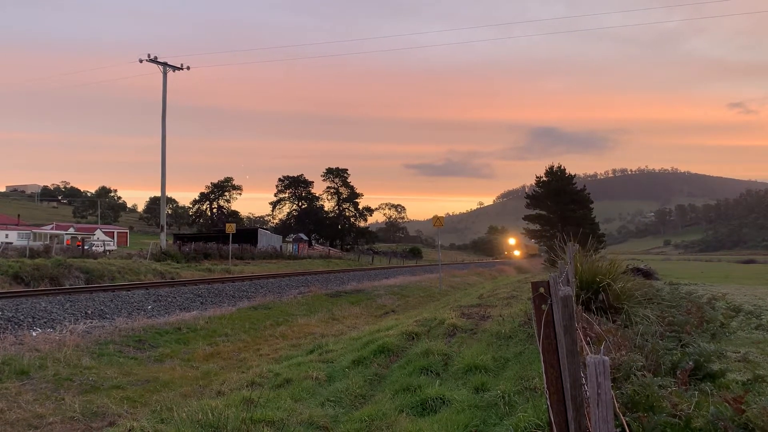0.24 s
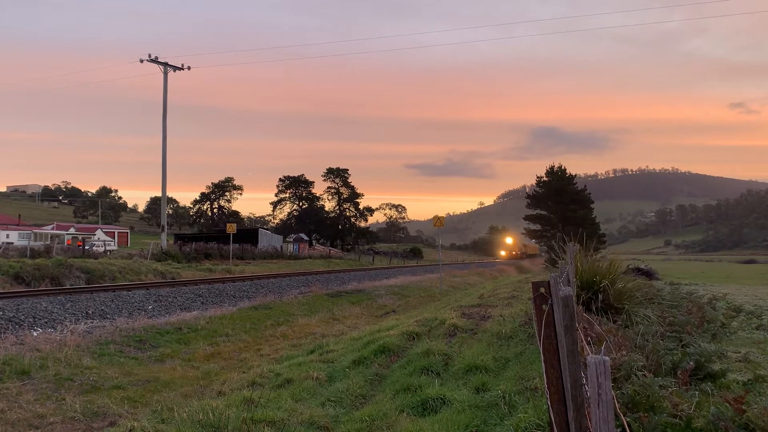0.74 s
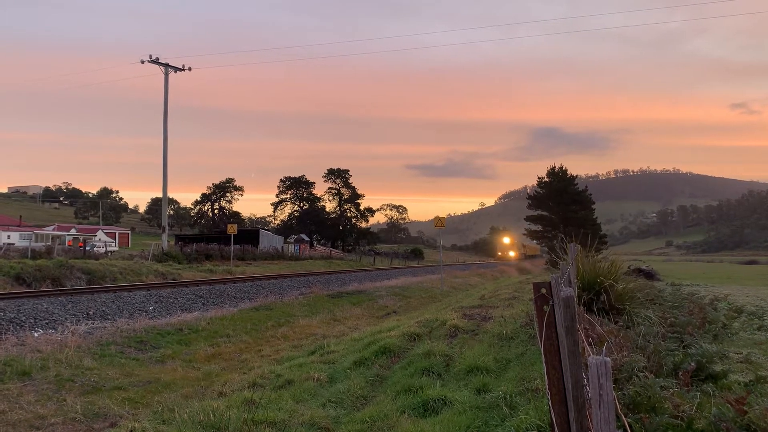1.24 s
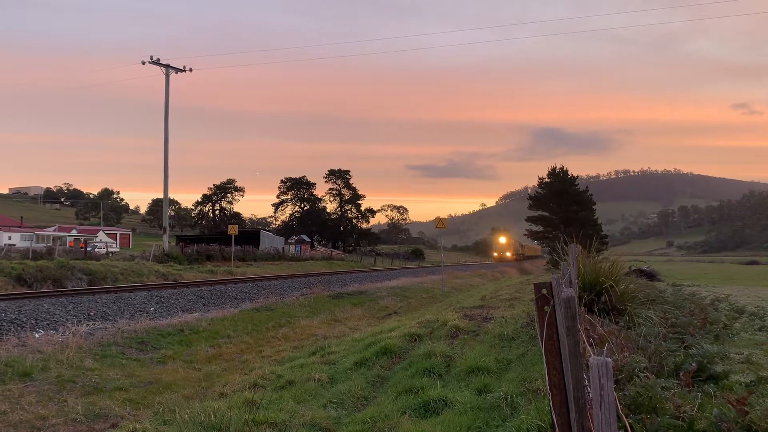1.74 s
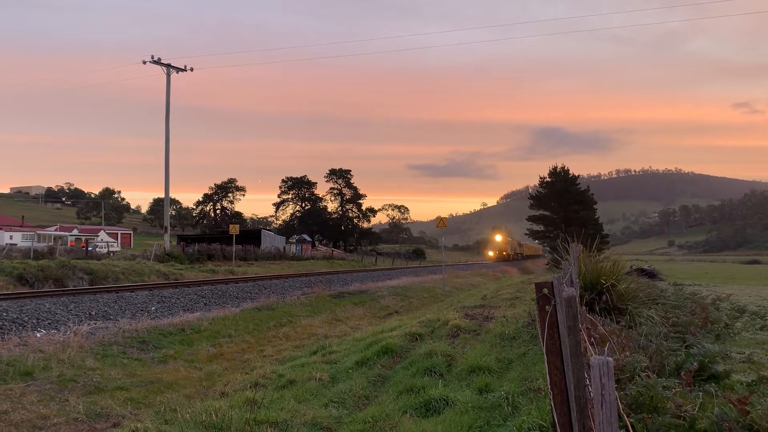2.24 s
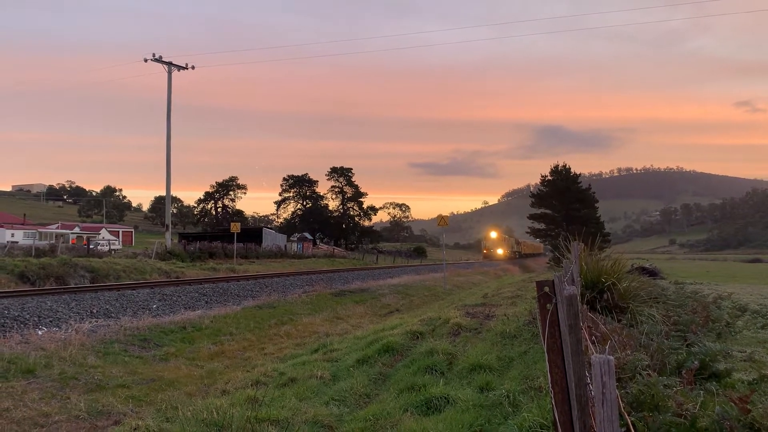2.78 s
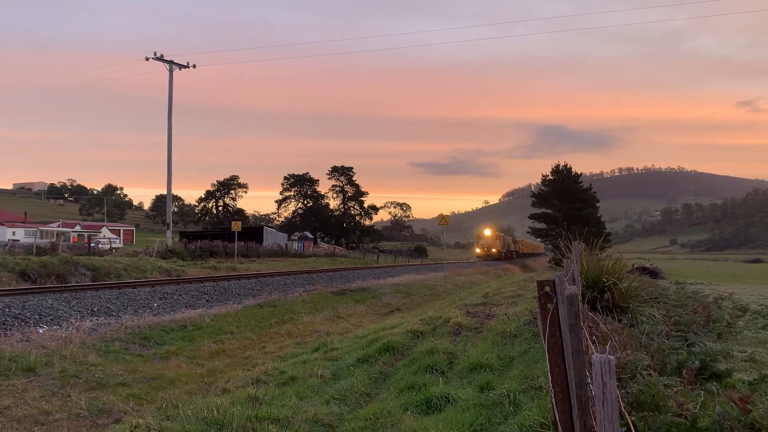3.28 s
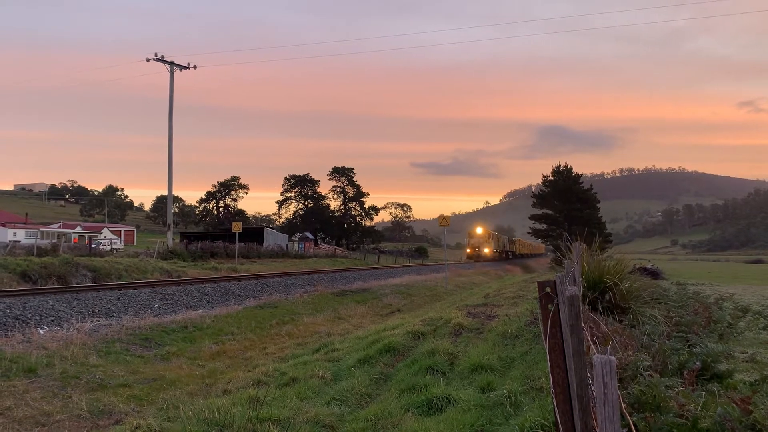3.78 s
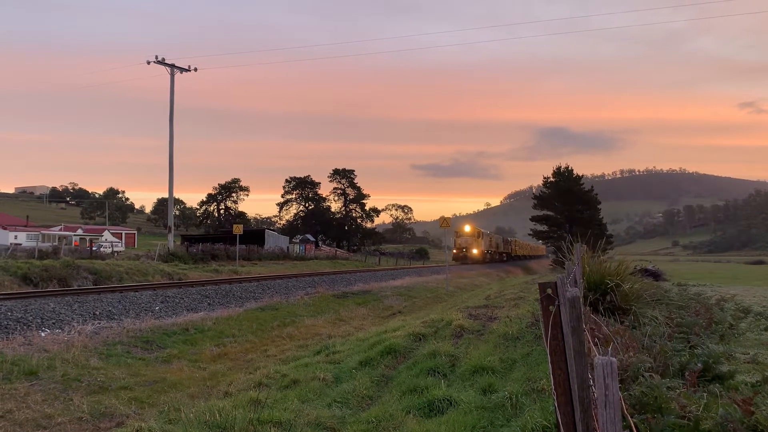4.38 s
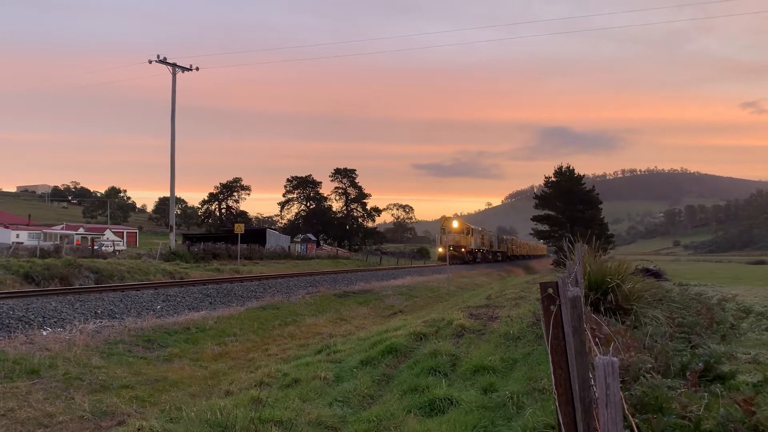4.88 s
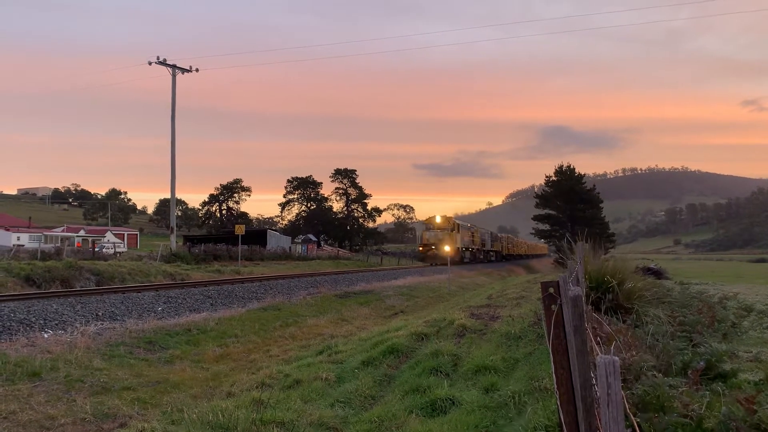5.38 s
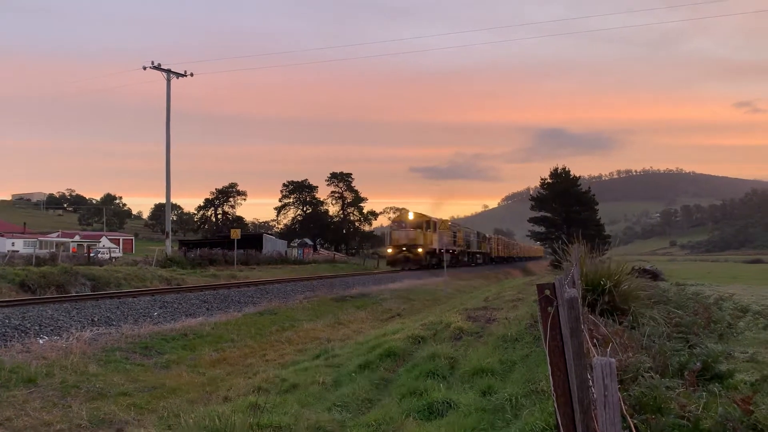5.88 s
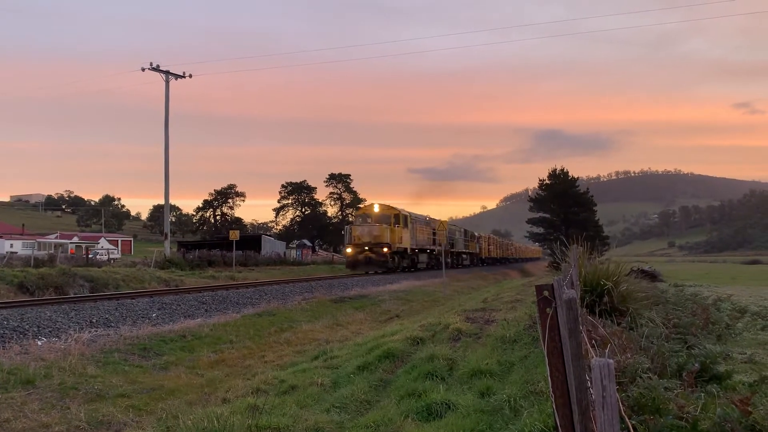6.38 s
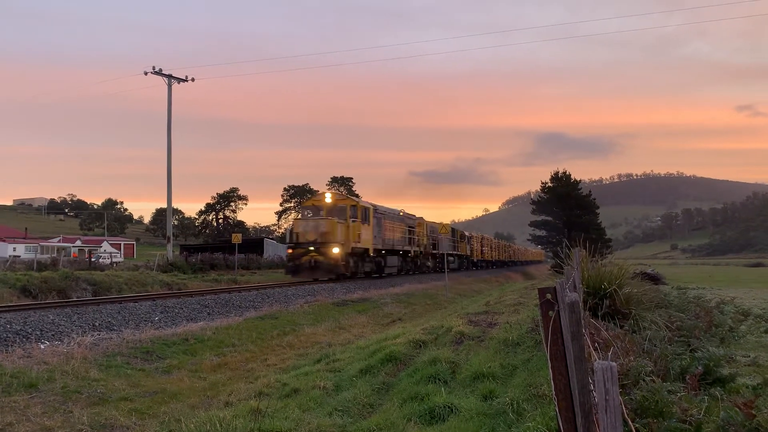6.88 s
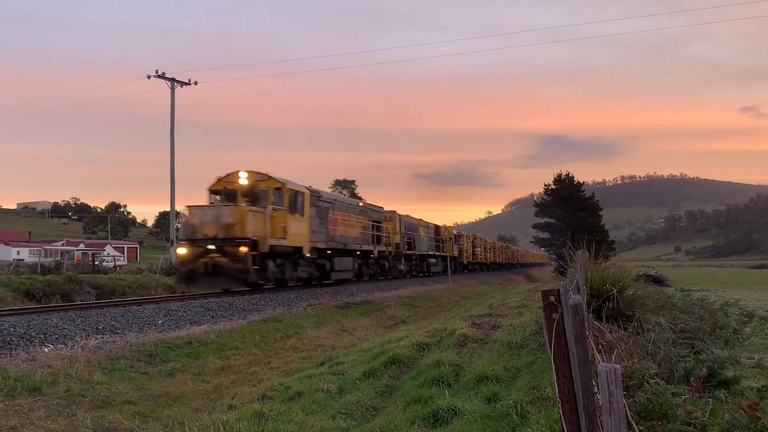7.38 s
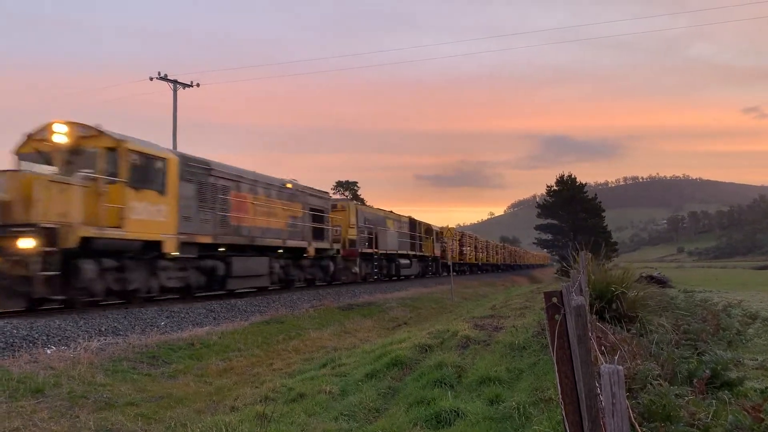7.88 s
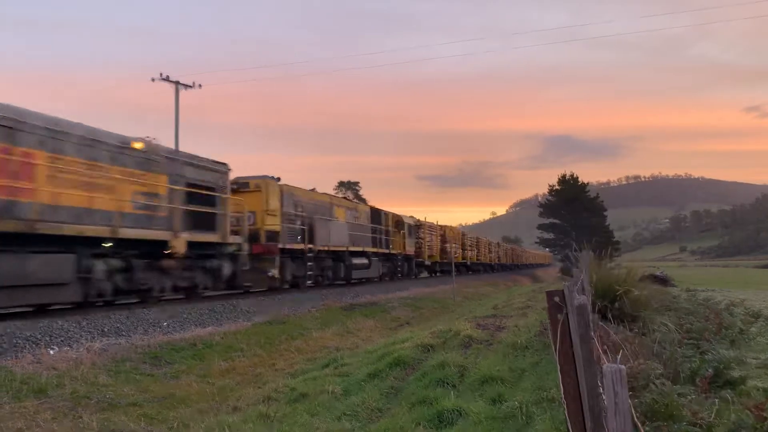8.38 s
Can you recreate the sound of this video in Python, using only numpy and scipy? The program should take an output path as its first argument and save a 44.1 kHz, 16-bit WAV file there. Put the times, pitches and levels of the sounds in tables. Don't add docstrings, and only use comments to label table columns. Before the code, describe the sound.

Open rural trackside, stereo phone microphone. From 0 s soft low wind buffeting covers a distant, muffled diesel drone: an uneven, fast exhaust throb around 95 Hz with faint blower whines near 1.1 kHz. Gusts thump at about 1.8, 2.2 and strongest at 3.2 s, with small wind slaps around 2.8 s. The engines gradually grow and brighten. At 4.6 s a loud, brassy two-note air horn, a major third apart with its low note near 360 Hz, starts breathily, beats slightly and stops at about 5.9 s with a short echo; automatic gain ducks everything beneath it. Background level then slowly recovers. From 6.4 s engine roar, clatter and hiss climb fast, with steel rattles at 6.5 and 7.5 s and short wheel scrapes from 7.7 s. The leading locomotive passes close from about 7.8 s, rails droning, sharp rattles clustering at 8.1-8.4 s, whine rising, still roaring at the 8.6 s end.

```python
import sys
import numpy as np
from scipy import signal
from scipy.fft import rfft, irfft, next_fast_len
from scipy.io import wavfile
from scipy.ndimage import uniform_filter1d, map_coordinates

SR = 44100
rng = np.random.default_rng(int(sys.argv[2]) if len(sys.argv) > 2 else 0)


def transcribe(signal):
    frames = np.atleast_2d(signal).T
    limited = np.clip(frames, -1, 1)
    pcm = np.round(limited * 32767).astype(np.int16)
    wavfile.write(sys.argv[1], SR, pcm)


def boost_factor(decibels):
    exponent = np.asarray(decibels, float) / 20
    return 10 ** exponent


N = 381024


def unit(x):
    return x / np.sqrt(np.mean(x ** 2) + 1e-20)


def along(points, hz):
    f, v = np.transpose(points)
    return np.interp(np.log(hz + 1), np.log(f + 1), v)


def curves(rows):
    s, *cols = np.transpose(rows)
    return [np.interp(np.arange(N) / SR, s, c) for c in cols]


def wobble(rate):
    knots = rng.standard_normal(int(N * rate / SR) + 4)
    return map_coordinates(knots, [np.arange(N) * rate / SR])


def filtered(x, response):
    m = next_fast_len(N + 8192)
    return irfft(rfft(x, m) * response(np.fft.rfftfreq(m, 1 / SR)), m)[..., :N]


def resonance(hz, centre_hz, width_hz):
    return 1j * hz * width_hz / (centre_hz ** 2 - hz ** 2 + 1j * hz * width_hz)


def ports(x, turn, pan):
    def half(hz):
        return boost_factor(along(pan, hz) / 2) * np.exp(.5j * along(turn, hz))
    return filtered(x, lambda hz: np.array([half(hz), 1 / half(hz)]))


# frequency_hz, share common to both ports
ALIKE = [(200, .93), (600, .8), (1500, .8), (2600, .55), (4000, .75), (6200, .7), (13000, .8)]
# frequency_hz, left_lead_rad
FAR_TURN = [(0, 0), (780, 0.2), (1720, 3.8), (2760, 6.7), (4740, 5.9), (6120, 6.3), (6890, 5.4),
            (7750, 3.5), (9470, 2.8), (9820, 1.0), (10400, -0.0), (11600, 0.1), (12600, -2.9),
            (13400, -3.2)]
# frequency_hz, left_minus_right_db
FAR_PAN = [(60, 0), (110, -0.5), (200, -1), (360, 0.2), (660, 0.7), (1200, 7), (2190, 1.3), (4000, -4.5),
           (7280, -2.7), (13300, 0.0)]


def rush(spectrum, alike, patchy_db):
    z = signal.stft(rng.standard_normal((3, N)), nperseg=512)[2]
    field = rng.standard_normal(z.shape[1:])
    field = uniform_filter1d(uniform_filter1d(field, 6, 0), 14, 1)
    noise = signal.istft(z * boost_factor(patchy_db * unit(field)), nperseg=512)[1][:, :N]
    noise = filtered(noise, lambda hz: boost_factor(along(spectrum, hz)))

    def share(hz):
        return np.clip(along(alike, hz), 0, 1)
    common = ports(filtered(noise[0], lambda hz: np.sqrt(share(hz))), FAR_TURN, FAR_PAN)
    return unit(common + filtered(noise[1:], lambda hz: np.sqrt(1 - share(hz))))


def swells(rough, rows, steady):
    now, out = np.arange(N) / SR, 0
    for centre_hz, width_hz, db, peak_s, swell_s in rows:
        ring = unit(filtered(rough, lambda hz: resonance(hz, centre_hz, width_hz)))
        power = np.abs(uniform_filter1d(ring ** 2, size=SR // 50))
        ring = ring / (power + .1) ** (steady / 2)
        out = out + boost_factor(db - 5.7 * ((now - peak_s) / swell_s) ** 2) * unit(ring)
    return out


DUCK_S, DUCK_DB, DUCK_FALL_S, DUCK_END_S, RECOVER_DB_PER_S = 4.612, -11, 0.34, 5.81, 1.88


def duck():
    t = np.arange(N) / SR
    fall = DUCK_DB * np.clip((t - DUCK_S) / DUCK_FALL_S, 0, 1)
    return fall + RECOVER_DB_PER_S * np.clip(t - DUCK_END_S, 0, None)


# time_s, level_db
WIND = [(0, -22.5), (3.3, -21.5), (3.6, -22.5), (4.6, -25), (6.1, -28.5), (8.0, -27), (8.64, -16)]
# frequency_hz, level_db
BUFFET = [(15, -41), (32, -15.5), (53, 0), (86, 3), (139, -3.5), (215, -12.5), (340, -27), (600, -53),
          (1200, -120)]
# peak_s, rise_db
GUSTS = [
    (0.7, 1.5),
    (1.4, -0.5),
    (1.8, 3.5),
    (2.2, 5),
    (2.8, 2.5),
    (3.2, 9),
    (6.4, 4),
]
# time_s, level_db
POPS = [
    (1.334, -17),
    (1.783, -19),
    (2.719, -17),
    (2.808, -11.5),
    (2.902, -14.5),
    (3.179, -15),
]
GUST_S, POP_S = 0.12, 0.00092


def wind():
    t = np.arange(N) / SR
    lumps = boost_factor(2.0 * wobble(12) + 2.5 * wobble(4.09))
    gust_db = sum(db * np.exp(-((t - s) / GUST_S) ** 2) for s, db in GUSTS)
    pops = 0
    for s, db in POPS:
        since = (t - s) / POP_S
        pops = pops + boost_factor(db) * (1 - since ** 2) * np.exp(-since ** 2 / 2)
    buffeting = unit(lumps * rush(BUFFET, [(30, 0.82), (200, 0.9)], patchy_db=1.5))
    return pops + boost_factor(curves(WIND)[0] + gust_db + duck() + 1.0) * buffeting


# time_s, level_db, air_treble_loss_db
ROAR = [(0, -37.5, 20), (0.6, -36, 17.5), (1.6, -37, 19), (2.1, -37.5, 13), (2.5, -37, 12),
        (3.0, -34, 14.5), (3.6, -33.5, 12), (3.95, -32, 10), (4.5, -30, 4), (5.2, -27.5, 11),
        (6.25, -30, 4), (6.45, -26, 6.5), (6.85, -23.5, 6.5), (7.3, -20.5, 3), (7.8, -12.5, 0),
        (8.1, -13, 1.5), (8.5, -11.5, -1), (8.64, -10.5, -0.5)]
# frequency_hz, density_db_per_hz
BODY = [(88, -26.5), (150, 0), (200, -19), (211, -18), (266, -5), (403, -10), (497, -5.5), (783, -14.5),
        (950, -21.5), (1240, -50.5), (2090, -120)]
# frequency_hz, density_db_per_hz
CLATTER = [(440, -37.5), (750, -6), (914, -8), (1120, -3.5), (1210, -9), (1440, -4), (1560, -6),
           (2700, -24.5), (3510, -52), (5940, -120)]
# frequency_hz, density_db_per_hz
HISS = [(1410, -22), (2400, -2), (3010, 0), (3380, -1.5), (4200, -3.5), (4860, -6), (5540, -11),
        (6810, -11), (8000, -22), (10400, -49), (17600, -120)]
# frequency_hz, level_db
FIZZ = [(5000, -120), (7000, -5), (9200, -2), (10200, -8), (11300, -5), (12600, -3.5), (13800, -24.5)]
# over_roar_db, share of the air loss, share of the duck taken once more
LAYERS = [
    (0, -0.039, 0),
    (-4.5, -0.068, 0.31),
    (-10, -0.011, 0.52),
    (-17.5, 0.95, 0.017),
]
# time_s, depth from 0 to 1
BOUNCE = [
    (6.2, 0),
    (7.2, .6),
    (8.2, .7),
    (8.4, .15),
]
# time_s, lead_ms
LEAD = [(0, -7.6), (1.2, -0.82), (1.7, 1.2), (2.4, 2.2), (3.2, 2.35), (5.5, -0.55), (6.0, -0.4), (6.4, 0.5),
        (7.2, 3.4), (7.6, 4.08), (8.0, 3.87), (8.64, -0.45)]
CRANK_HZ = 15.85


def crank():
    return CRANK_HZ * (np.arange(N) / SR + curves(LEAD)[0] / 1000)


def roar():
    roar_db, haze_db = curves(ROAR)
    body_db, clatter_db, hiss_db, fizz_db = (
        roar_db + over_db - hazy * haze_db + (1 + ducked) * duck() for over_db, hazy, ducked in LAYERS)

    def pumped(spectrum, depth_db, lag_turns, patchy_db):
        pump = boost_factor(depth_db * np.cos(2 * np.pi * (crank() - lag_turns)))
        return unit(pump * rush(spectrum, ALIKE, patchy_db))
    surge = wobble(7)
    body = boost_factor(body_db + .9 * wobble(8) - 0.1) * pumped(BODY, 1.0, 0.06, 0.5)
    clatter = boost_factor(clatter_db + .5 * surge - 0.38) * pumped(CLATTER, 0.84, .05, 1.67)
    hiss = boost_factor(hiss_db + .5 * surge - 1.57) * pumped(HISS, 1.5, .05, 2.0)
    fizz = boost_factor(fizz_db + 0.76 * wobble(13) + 2.7) * pumped(FIZZ, 2.5, .05, 3.5)
    bright = clatter + hiss
    bright = bright - curves(BOUNCE)[0] * filtered(bright, lambda hz: resonance(hz, 3050, 1100))
    return body + bright + fizz


# time_s, pitch_hz, level_db
BLOWER = [(0, 1148, -58), (1.5, 1145, -51), (2.1, 1133, -52), (2.6, 1131, -50), (3.8, 1124, -52),
          (4.4, 1130, -61), (5.9, 1160, -57), (7.3, 1158, -52), (8.0, 1150, -41), (8.16, 1147, -32),
          (8.35, 1137, -38), (8.5, 1134, -25), (8.64, 1133, -28)]
# time_s, pitch_hz, level_db
SECOND = [(0, 1075, -57.5), (2, 1075, -51), (3.1, 1088, -66), (3.3, 1092, -41.5), (3.9, 1062, -52),
          (4.25, 1057, -41), (4.55, 1050, -54)]


def whines():
    def tone(hz, db):
        level = boost_factor(db + 3.5 + 2.5 * wobble(9))
        return level * np.sin(2 * np.pi * np.cumsum(hz + 2.5 * wobble(21)) / SR)
    roar_db, haze_db = curves(ROAR)
    blade_hz, blade_db = curves(BLOWER)
    blowers = tone(blade_hz, blade_db) + tone(2 * blade_hz, blade_db - 13.5)
    blowers = blowers + tone(*curves([*SECOND, (4.7, 1057, -90)]))
    whistle = unit(filtered(rng.standard_normal(N), lambda hz: resonance(hz, 11290, 90) ** 2))
    whistle_db = 0.65 * (roar_db + duck()) - 0.52 * haze_db - 46.5
    return ports(blowers + boost_factor(whistle_db) * whistle, FAR_TURN, FAR_PAN)


# centre_hz, width_hz, level_db, peak_s, swell_s
RAILS = [(228.6, 12, -21.5, 8.56, 0.38), (267, 9, -19, 8.5, 0.28), (343, 9.9, -19, 8.61, 0.08),
         (496, 24, -28.5, 7.99, 0.46), (563, 13, -34, 7.74, 0.68), (708, 13, -25, 8.5, 0.57),
         (800, 18, -32, 8.3, 0.23), (884, 59, -28, 7.85, 0.15), (1457, 45, -29, 7.85, 0.17)]
# frequency_hz, share common to both ports
ROLL = [(600, 0.86), (1500, 0.53)]
# start_s, level_db, decay_t60_s
RATTLES = [(2.1494, -49, 0.08), (6.3894, -48, 0.1), (6.4954, -31, 0.071), (7.1484, -41, 0.087),
           (7.5146, -21, 0.1), (7.7029, -22, 0.11), (7.8294, -32, 0.16), (7.96, -31, 0.15),
           (8.0994, -13.5, 0.12), (8.142, -22, 0.063), (8.2082, -13.5, 0.12), (8.3384, -10, 0.15),
           (8.3875, -11.5, 0.12), (8.519, -25, 0.054)]
# centre_hz, width_hz, level_db, peak_s, swell_s
GRINDS = [
    (3800, 550, -45.5, 7.05, .05),
    (2200, 670, -36, 7.74, 0.079),
    (3360, 180, -39.5, 7.73, 0.074),
    (1670, 300, -31.5, 7.93, 0.11),
    (4200, 900, -33.5, 8.38, 0.11),
]


def rolling():
    rough = rush([(100, -46), (200, 2.5), (1600, -6.5), (2500, -120)], ROLL, patchy_db=2.5)
    drone = swells(rough, RAILS, steady=0.7)
    t, jolts = np.arange(SR // 4) / SR, np.zeros(N + SR)
    for s, db, t60 in RATTLES:
        decay = boost_factor(db - 10 - 60 * t / np.clip(t60, .01, .5))
        jolts[round(s * SR):][:len(t)] += decay * (1 - np.exp(-t / .006))
    steel = [(400, -120), (1500, -35), (3500, -3), (6000, 2), (13800, -8)]
    rattle = jolts[:N] * rush(steel, ALIKE, patchy_db=2.0)
    scrape = rush([(1000, 1), (6000, -5.5)], ALIKE, patchy_db=3.0)
    return drone + rattle + swells(scrape, GRINDS, steady=0)


# crank_angle_deg, blast_db
CYLINDERS = [(-67.3, -4.1), (-1.3, 0.0), (35.7, -2.1), (182.9, -5.1), (250.3, -8.1), (308.2, -1.4)]
# centre_hz, width_hz
STACK = [(75, 20), (119, 48)]
# multiple of the crank rate, level_db
ORDER = [(2, -47.5), (3, -23.5), (4, -12.5), (5, -7.5), (6, 2), (7, -1.5), (8, -5), (9, -12.5), (10, -14.5),
         (11, -20), (12, -16.5), (13, -22.5), (14, -31.5), (15, -38), (16, -26.5), (17, -24.5), (18, -29),
         (19, -42)]
# time_s, beat_db, upper_orders_db
EXHAUST = [(0, -17, 0), (0.6, -18.5, 6), (1.3, -18, 3.5), (1.8, -14.5, 2), (2.7, -13.5, 1),
           (3.13, -15, 2.5), (3.5, -12.5, 4.5), (4.6, -10, 2.5), (4.7, -12, 2.5), (4.96, -11, 3.5),
           (5.32, -8.5, 1.5), (5.6, -11.5, 2.2), (7.0, -7.5, 0.5), (7.2, -8, -3.5), (7.94, -5.5, -13.5),
           (8.52, -6.5, -14), (8.64, -12.5, -9)]


def exhaust():
    beat_db, upper_db = curves(EXHAUST)
    turns, out = crank(), np.zeros((2, N))
    for k, db in ORDER:
        k = round(k)
        blasts = sum(boost_factor(size) * np.exp(-1j * k * np.radians(deg)) for deg, size in CYLINDERS)
        timing = np.angle(blasts * np.prod([resonance(k * CRANK_HZ, *pipe) for pipe in STACK]))
        shimmer = boost_factor(db + 0.085 * k * wobble(2.64))
        out[int(k > 8)] += shimmer * np.cos(2 * np.pi * k * turns + timing + 0.049 * k * wobble(3.1))
    beats = (out[0] + boost_factor(upper_db) * out[1]) / np.std(out[0])
    return boost_factor(beat_db + duck()) * beats * boost_factor([[-.45], [.45]])


TOP_HZ = (13100, 13760)


def partial(phase, hz, db, bright_db):
    shine = np.clip(hz / 5000, 0, 1)
    level_db = db + shine ** 2 * bright_db + hz / 4000 + (1.2 + hz / 4000) * wobble(7)
    drift = .06 * rng.normal() + (.3 * shine + (hz / 8500) ** 2) * wobble(9)
    return boost_factor(level_db) * np.cos(phase + drift)


def trumpet(phase, note_hz, bell, bright_db, top_db):
    level_db = [db for _, db in bell] + list(top_db + rng.normal(0, 1.7, size=30))
    overtones = range(1, int(TOP_HZ[1] / note_hz))
    return sum(partial(k * phase, k * note_hz, level_db[k - 1], bright_db) for k in overtones)


# frequency_hz, level_db
BLEND = [(270, -11.5), (540, -21), (1000, -15), (2000, -24), (2700, -18.5), (3800, -11.5), (4700, -19),
         (5600, -14.5), (7500, -13), (12000, -11.5)]


def blend(low, high, step_hz, bright_db):
    out = 0
    for n in range(3, int(TOP_HZ[1] / step_hz)):
        if n % 4 == 0 or n % 5 == 0:
            continue
        b = (n + 1) % 4 - 1
        a = (n - 5 * b) // 4
        phase = a * low + b * high + rng.uniform(0, 2 * np.pi)
        db = along(BLEND, n * step_hz) + rng.normal(0, 0.62)
        out = out + partial(phase, n * step_hz, db, bright_db)
    return out


# time_s, level_db, brightness_db
HORN = [(4.585, -45, -26), (4.624, -15.5, -12), (4.96, -13.5, 2), (5.15, -13, -2), (5.27, -12, -0.5),
        (5.5, -12.5, -4.5), (5.711, -10.5, -2.5), (5.851, -28, -19.5), (5.9, -62, -15.5)]
# time_s, pitch_hz
LOW_NOTE = [(4.59, 366), (4.635, 364.3), (4.71, 360.4), (4.9, 359.6), (5.05, 359.2), (5.72, 359.3),
            (5.87, 363.5)]
# multiple, level_db
LOW_BELL = [(1, -3.5), (2, 0.5), (3, 1), (4, 1.5), (5, -3), (6, -7), (7, -5.5), (8, -14), (9, -7.5),
            (10, -4.5), (11, -11.5), (12, -14)]
# multiple, level_db
HIGH_BELL = [(1, 0.5), (2, 1.5), (3, 2.5), (4, -3.5), (5, 0.5), (6, -6), (7, -1), (8, -3), (9, -1.5),
             (10, -8.5), (11, -14.5), (12, -7)]
# time_s, level_db
LINGER = [(4.6, 2.5), (5.7, 1.4), (5.8, 7.5), (5.88, 6.5)]
# time_s, beat_hz
BEAT = [(4.59, 6), (4.7, 10), (4.8, 2.3), (5.08, 1.9), (5.24, 1.6), (5.29, 0.1), (5.7, 0.35), (5.74, -4),
        (5.82, 0)]
# frequency_hz, left_lead_rad
HORN_TURN = [(0, 0), (1720, 0.4), (1980, -1.1), (2670, 0.6), (4480, 1.3), (4820, 5.2), (5860, 7.0),
             (6720, 5.0), (7320, 5.3), (8100, 3.1), (8870, 3.1), (10400, 0.3), (11600, -0.4), (13400, -3.6)]
# frequency_hz, left_minus_right_db
HORN_PAN = [(60, 1), (110, 3), (200, 2), (360, -3), (660, 2), (1200, 0.5), (2190, 3.5), (4000, -5.5),
            (7280, -4), (13300, -1.5)]
CANCEL_S = 5.22
SMEAR_RAD, SMEAR_HZ = 0.8, 210


def horn():
    level_db, bright_db = curves([(4.57, -90, HORN[0][2]), *HORN, (5.93, -90, HORN[-1][2])])
    low, beat = (2 * np.pi * np.cumsum(curves(rows)[0]) / SR for rows in (LOW_NOTE, BEAT))
    high = (5 * low + beat - beat[round(CANCEL_S * SR)] + np.pi) / 4
    low_note = trumpet(low, 420, LOW_BELL, bright_db + 4.5, top_db=-16.0) * boost_factor(curves(LINGER)[0] - 1.5)
    high_note = trumpet(high, 450, HIGH_BELL, bright_db + 6, top_db=-18.5)
    notes = unit(low_note + high_note + blend(low, high, 92.6, bright_db + 1.5))
    notes = filtered(notes, lambda hz: np.exp(1j * SMEAR_RAD * np.sin(hz / SMEAR_HZ)))
    air_shape = [(200, -40), (1000, 5.0), (5000, 3.5), (12000, 2.5)]
    air = filtered(np.abs(notes) * rng.standard_normal(N), lambda hz: boost_factor(along(air_shape, hz)))
    valve = boost_factor(-60 * np.abs(np.arange(N) / SR - 4.62) / 0.48)
    blast = boost_factor(level_db + duck() + 2) * (notes + (boost_factor(-15) + .35 * valve) * air)
    blur = rng.standard_normal((2, SR // 4)) * boost_factor(-60 * np.arange(SR // 4) / SR / 0.35)
    echo = signal.fftconvolve(blast[None], blur / np.linalg.norm(blur[0]), axes=1)[:, :N]
    return ports(blast, HORN_TURN, HORN_PAN) + boost_factor(-14) * echo


def scene():
    return wind() + roar() + whines() + rolling() + exhaust() + horn()


MID_GAP_HZ, SIDE_GAP_HZ = (8600, 330), (11100, 650)
HEARD_DB, HEARD_ABOVE_HZ = -97, 6800


def thinned(x, gap, top_hz, mask_db):
    hz, _, z = signal.stft(x, SR, nperseg=2048)
    off = np.abs(hz - gap[0]) / gap[1]
    notch = (off > 1) * boost_factor(-12 * np.exp(-(off / 1.75) ** 4))
    edge = (hz < top_hz) * boost_factor(-6 * (hz / top_hz) ** 40)
    z = z * (notch * edge)[:, None]
    power = np.abs(z[:1024].reshape(128, 8, -1)) ** 2
    power = power.mean(axis=1)
    band_hz = hz[:1024:8][:, None]
    keep = (power > boost_factor(2 * mask_db) * uniform_filter1d(power, size=13, axis=0)) | (band_hz < 1500)
    keep = keep & ((power > boost_factor(2 * HEARD_DB)) | (band_hz < HEARD_ABOVE_HZ))
    z = z * np.vstack([np.repeat(keep, 8, axis=0), keep[-1:]])
    return signal.istft(z, SR, nperseg=2048)[1][:N]


def low_pass(x):
    return signal.sosfilt(signal.butter(12, 13860, fs=SR, output="sos"), x)


def record(dry):
    x = dry / (1 + np.abs(dry / .94) ** 6) ** (1 / 6)
    mid = thinned((x[0] + x[1]) / 2, MID_GAP_HZ, TOP_HZ[0], mask_db=-14)
    side = thinned((x[0] - x[1]) / 2, SIDE_GAP_HZ, TOP_HZ[1], mask_db=-13)
    return low_pass(np.array([mid + side, mid - side]))


dry = scene()
out = record(dry)
transcribe(out)
```